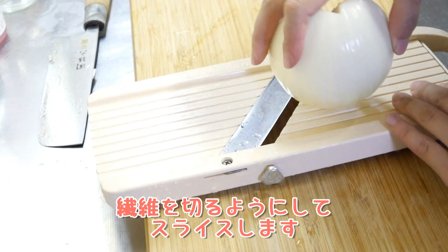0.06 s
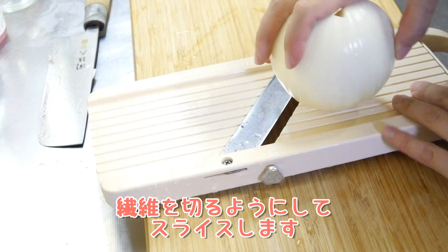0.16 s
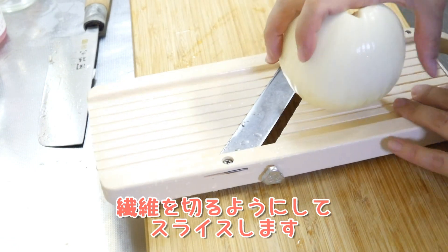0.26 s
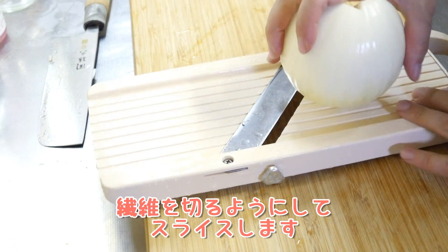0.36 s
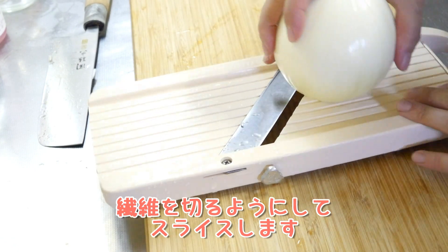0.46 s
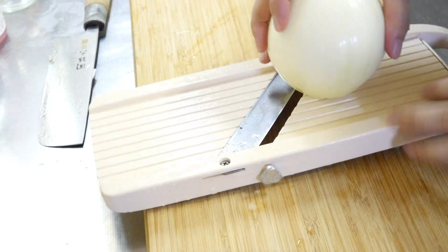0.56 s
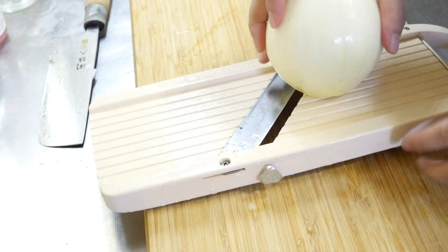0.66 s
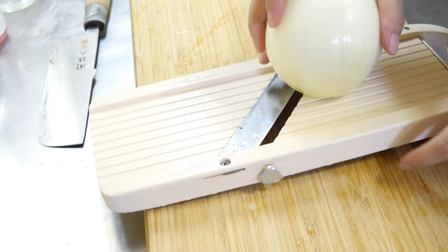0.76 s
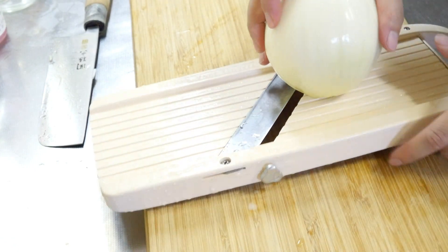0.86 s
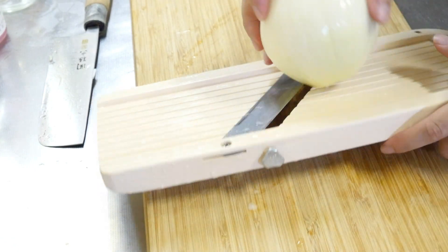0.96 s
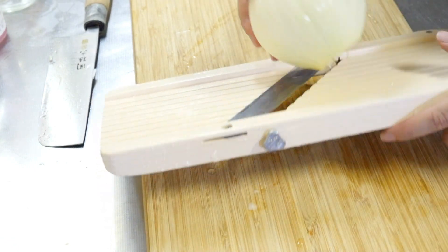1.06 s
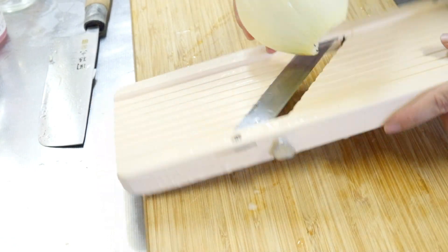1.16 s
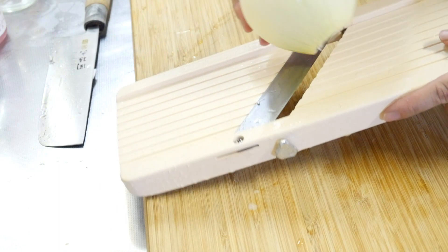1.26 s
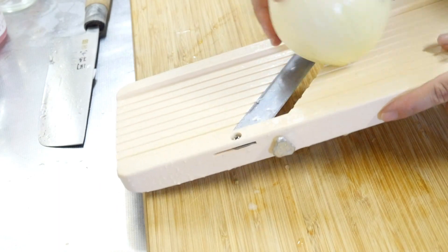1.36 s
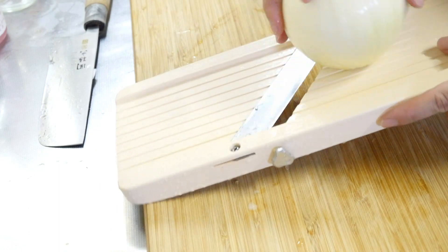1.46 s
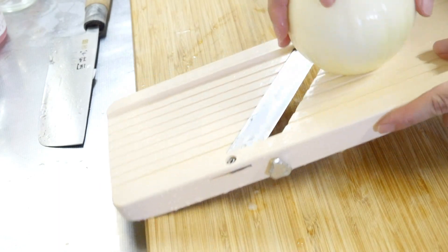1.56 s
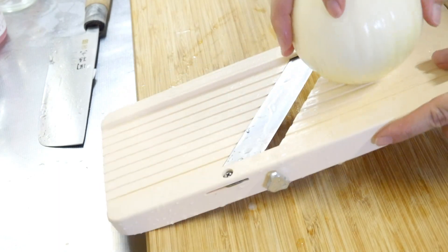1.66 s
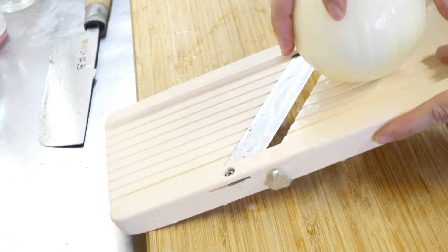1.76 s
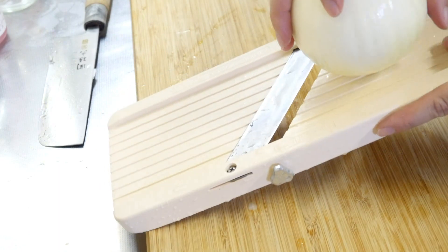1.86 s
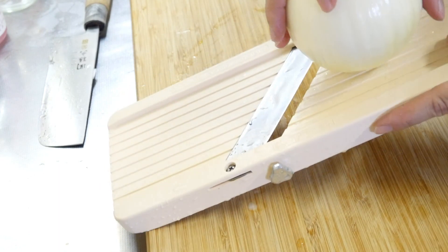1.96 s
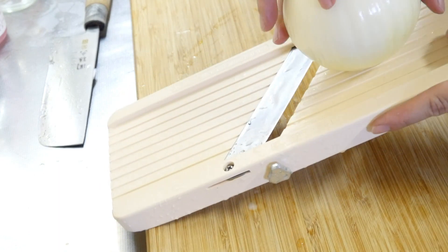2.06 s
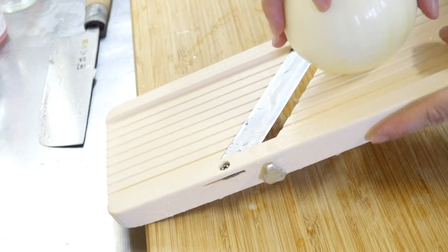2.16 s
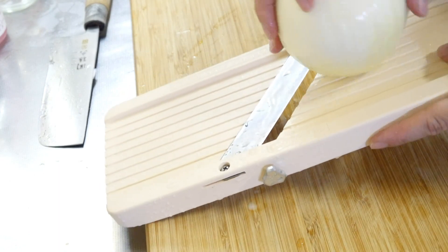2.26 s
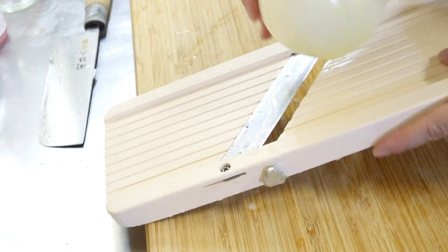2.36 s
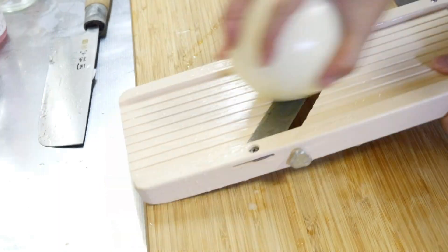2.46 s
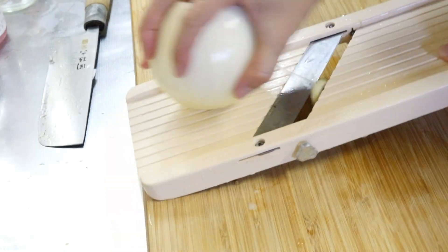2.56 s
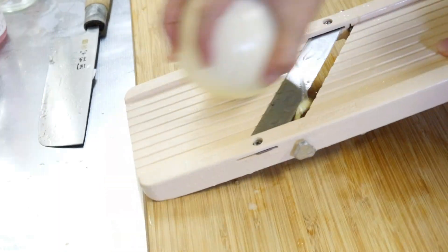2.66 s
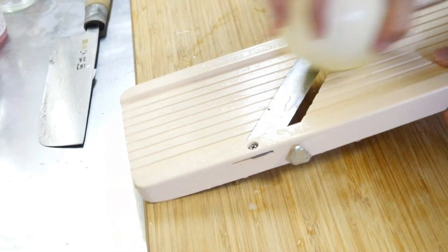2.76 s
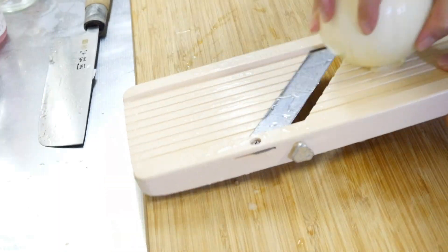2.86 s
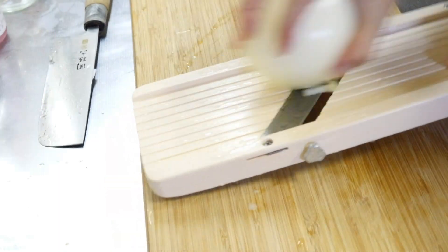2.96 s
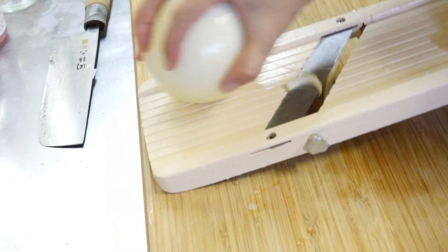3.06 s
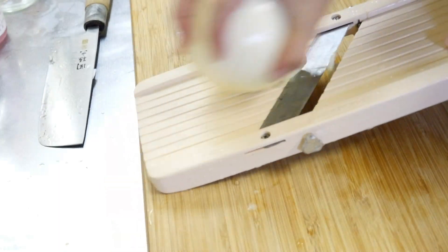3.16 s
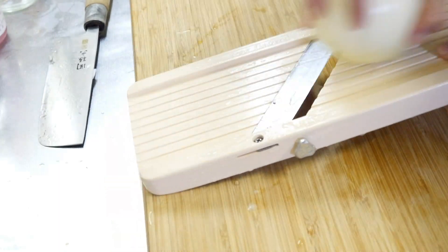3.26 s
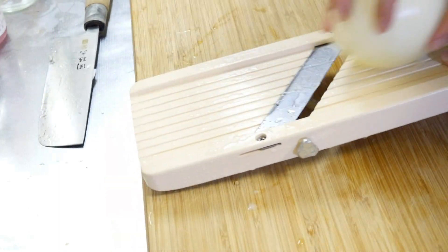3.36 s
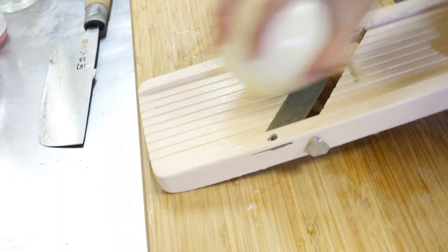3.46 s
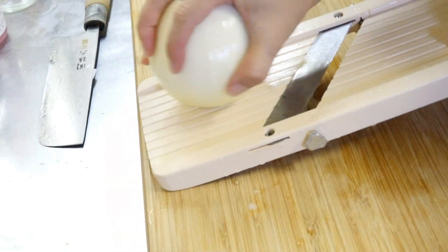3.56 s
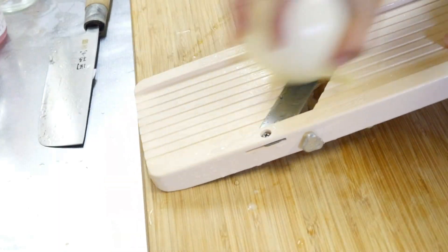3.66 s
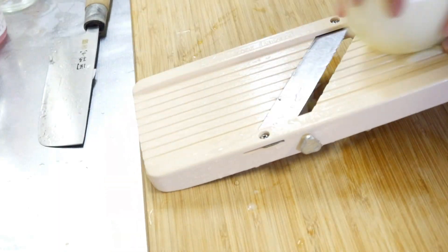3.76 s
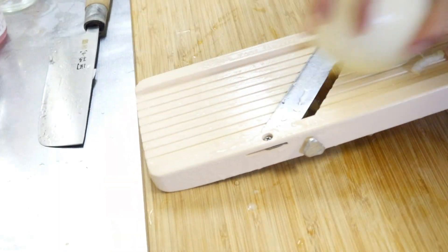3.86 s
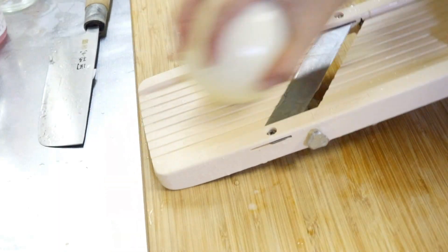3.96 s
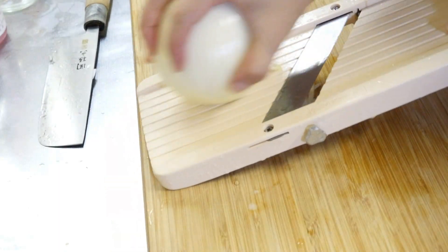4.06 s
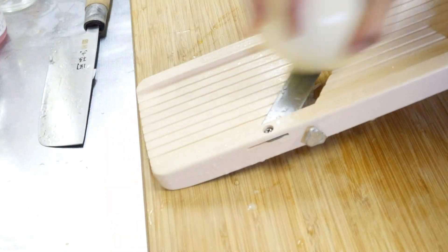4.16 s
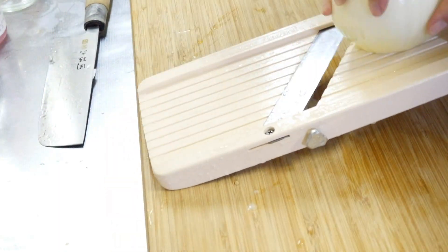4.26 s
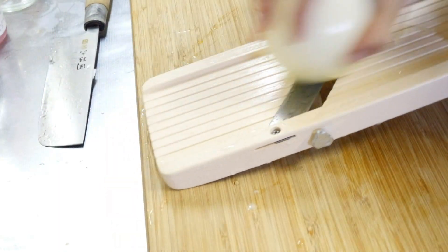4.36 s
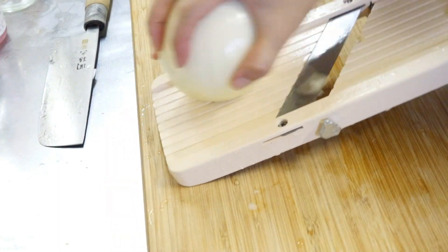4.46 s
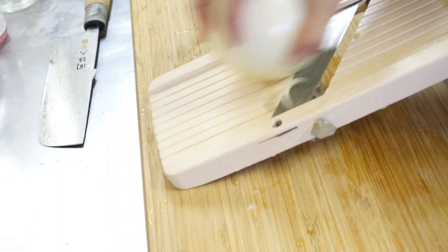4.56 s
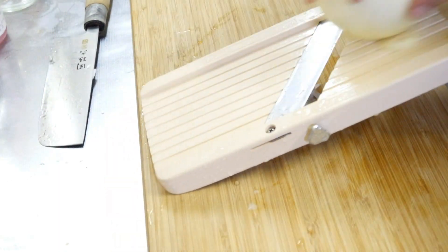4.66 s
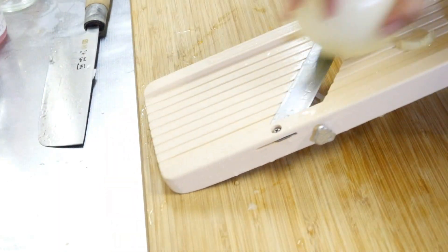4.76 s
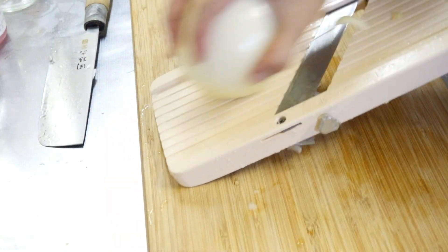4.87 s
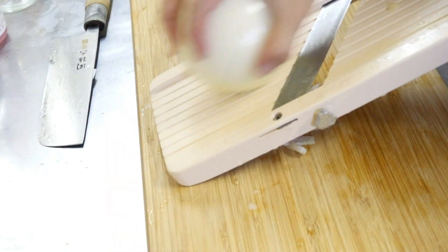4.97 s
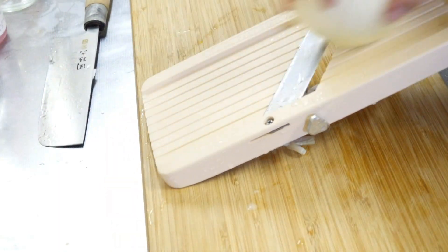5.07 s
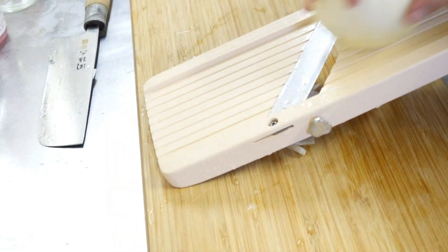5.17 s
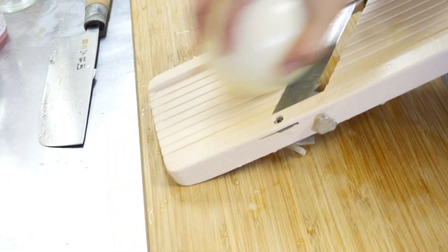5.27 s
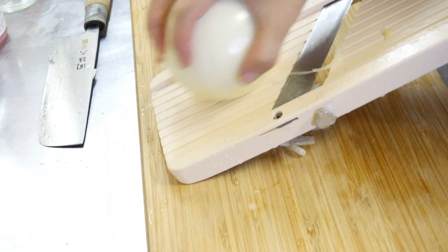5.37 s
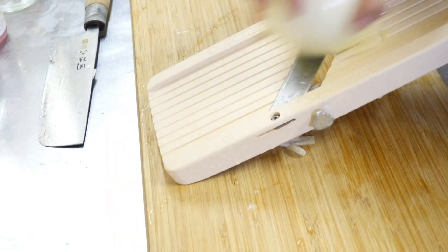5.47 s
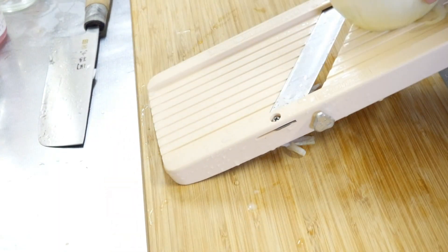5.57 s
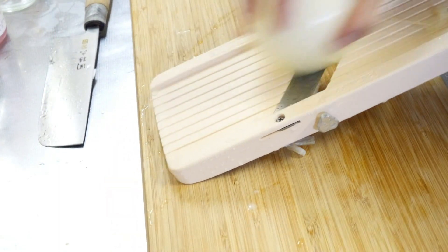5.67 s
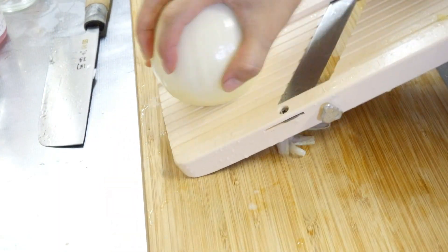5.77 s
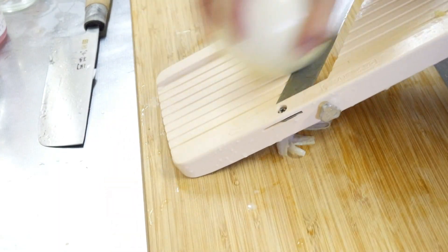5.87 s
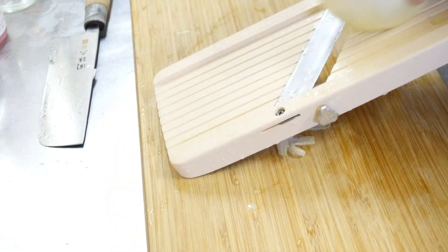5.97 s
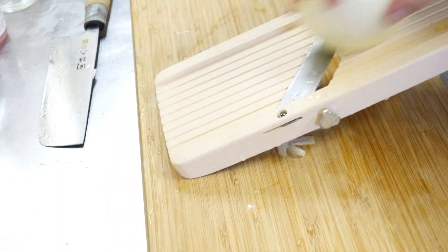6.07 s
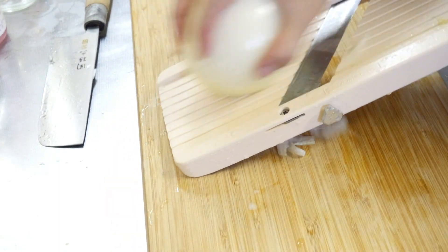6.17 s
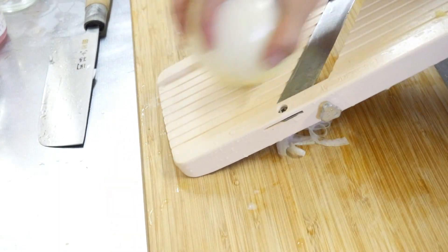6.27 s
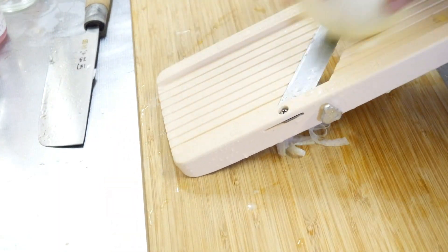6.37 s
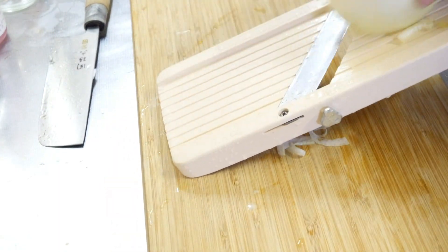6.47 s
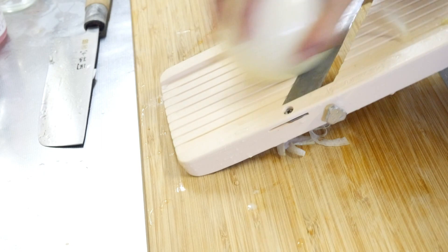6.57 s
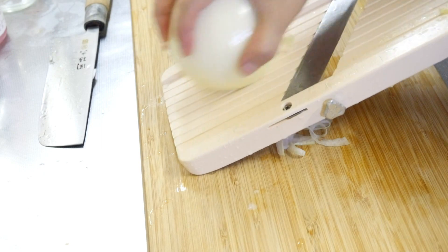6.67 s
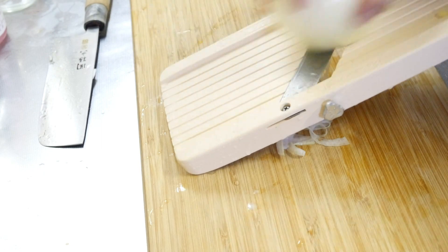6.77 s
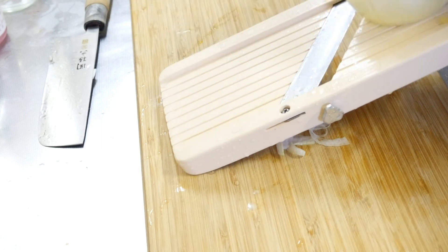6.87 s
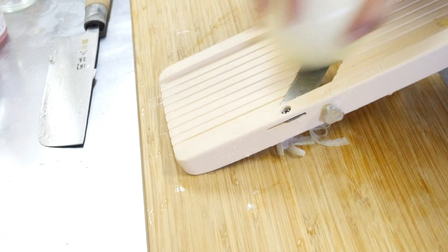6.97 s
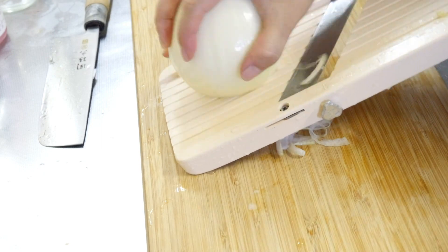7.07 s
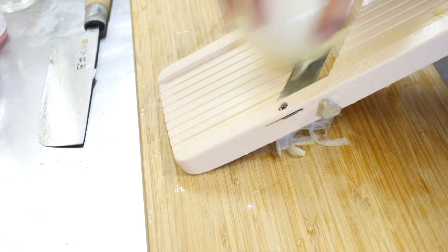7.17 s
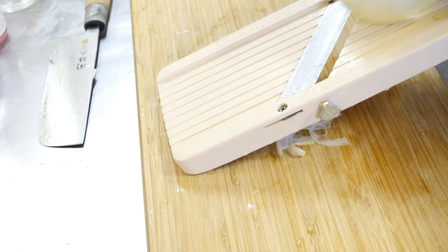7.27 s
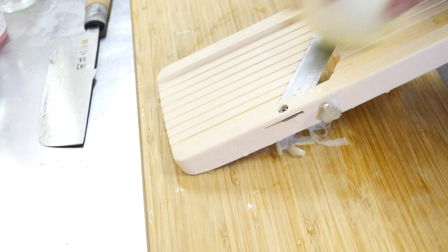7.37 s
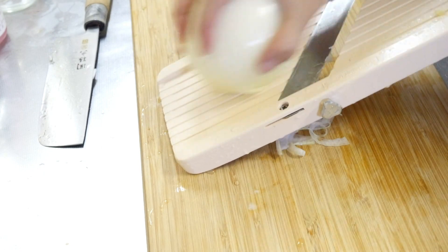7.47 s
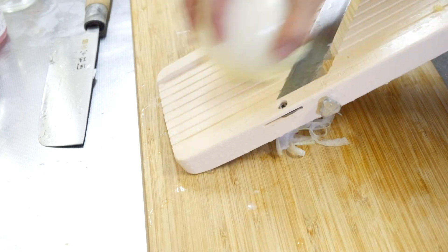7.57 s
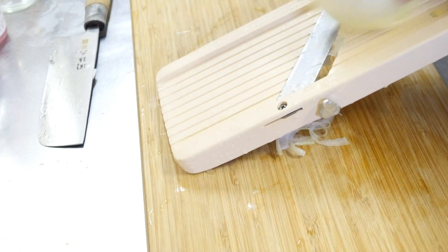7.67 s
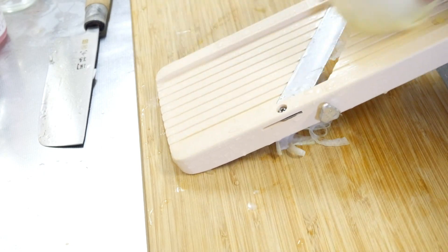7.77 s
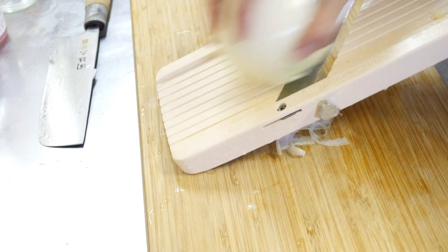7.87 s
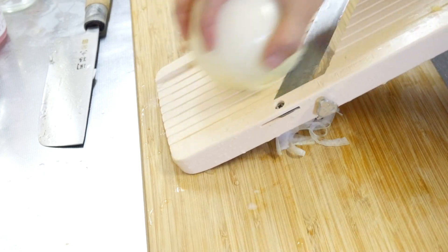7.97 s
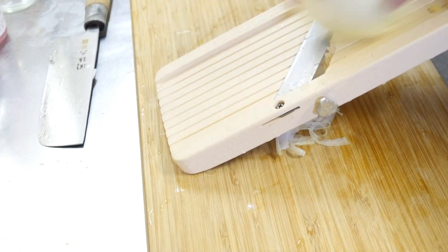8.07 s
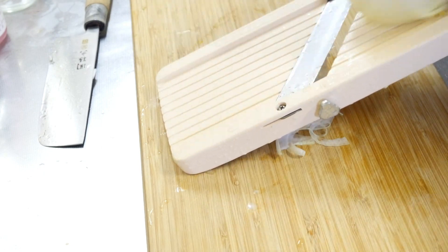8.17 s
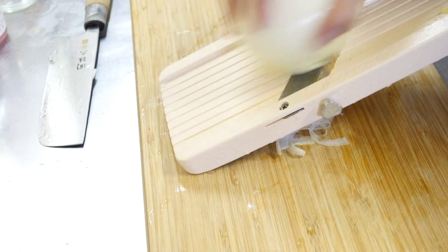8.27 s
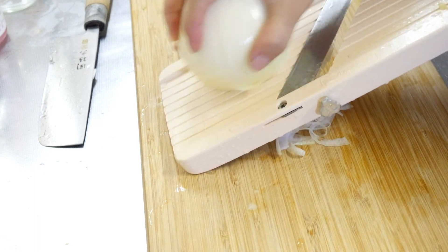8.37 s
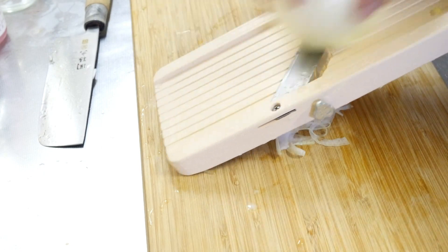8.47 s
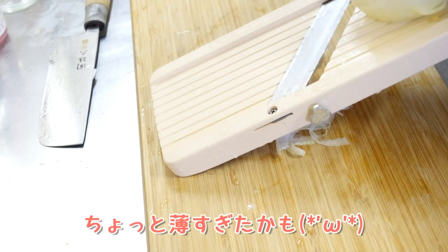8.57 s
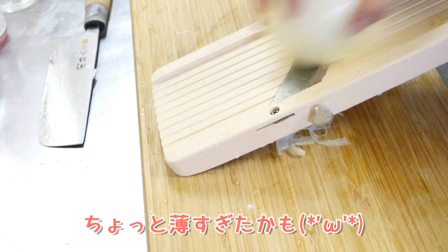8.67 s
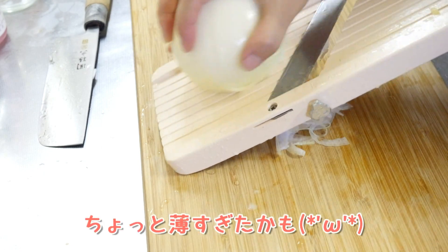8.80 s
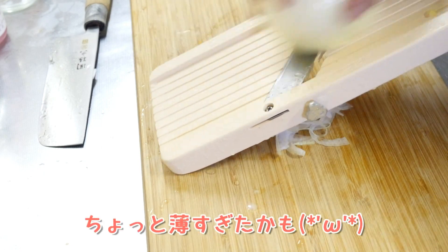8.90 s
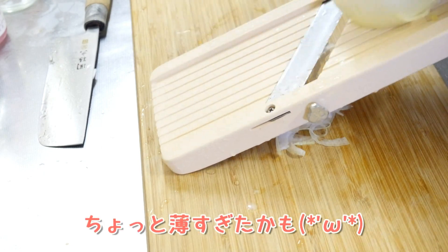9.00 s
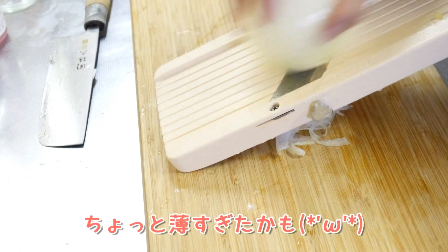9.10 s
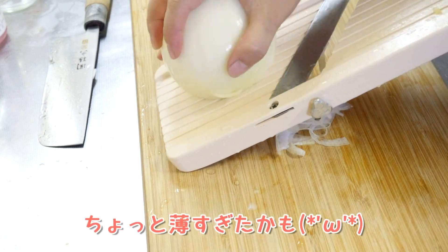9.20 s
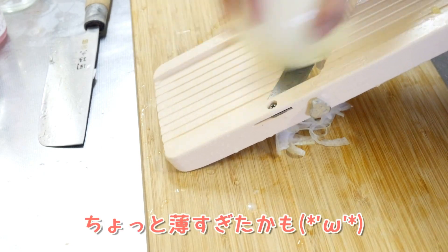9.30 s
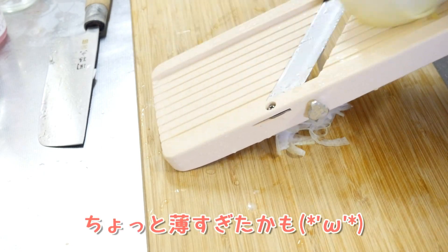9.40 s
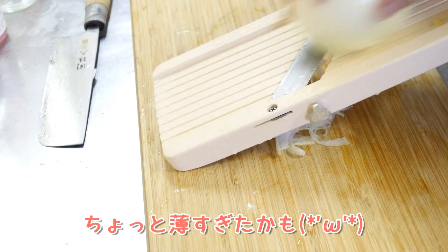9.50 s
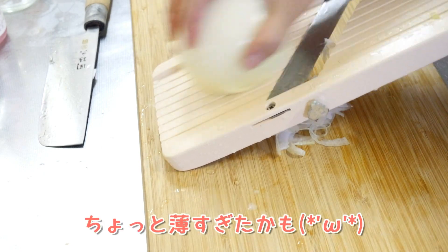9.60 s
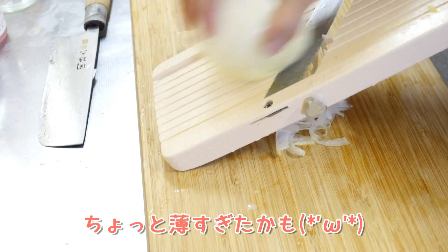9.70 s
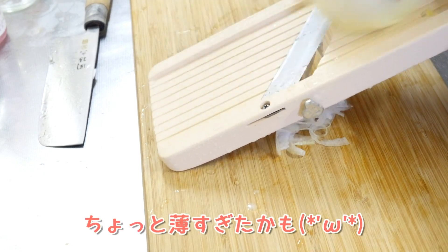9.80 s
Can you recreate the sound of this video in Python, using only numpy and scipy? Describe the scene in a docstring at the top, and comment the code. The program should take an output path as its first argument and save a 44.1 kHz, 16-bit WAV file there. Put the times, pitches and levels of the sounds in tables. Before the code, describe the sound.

Quick wet rasping strokes of an onion across a ribbed hand slicer, with light knocks and clicks, in a small hard kitchen.

```python
"""Onion on a ribbed slicer

An onion is slid up and down a ribbed plastic slicer that stands on a wooden board in a small hard kitchen.
Each push is friction noise: a wet hiss from the ribs, a rasp through the blade and deck modes, a rumble in the body.
Knocks, clicks and tearing slices are impulses into resonances, answered by a wall and a decaying noise tail.
Dragging and faint squeaks are noise through a few modes; a fan, as shaped noise, hums far away.
"""
import sys
import numpy as np
from scipy import signal
from scipy.fft import rfft, irfft, next_fast_len
from scipy.io import wavfile
from scipy.ndimage import uniform_filter1d, map_coordinates

SR = 44100
rng = np.random.default_rng(int(sys.argv[2]) if len(sys.argv) > 2 else 0)


def unload_audio(sound):
    """Save the sound as a 16-bit wav file, at the path given as the first command line argument."""
    columns = np.transpose(np.atleast_2d(sound))
    # keep every value between -1 and 1, then stretch to whole-number steps
    steps = np.round(np.clip(columns, -1, 1) * 32767)
    wavfile.write(sys.argv[1], SR, steps.astype(np.int16))


N = 433944  # length in samples

# Cutting pushes down the slope. Each row: fastest moment in seconds, climb in seconds,
# wet hiss in dB, blade rasp in dB, body rumble in dB.
PUSHES = [(2.534, 0.014, -37.5, -49.5, -41.5), (3.013, 0.048, -44.5, -43, -43.5),
          (3.49, 0.031, -42, -38.5, -39), (3.963, 0.04, -44, -40.5, -38), (4.422, 0.035, -43, -39.5, -40),
          (4.86, 0.059, -46, -43, -41.5), (5.286, 0.05, -43.5, -41.5, -42.5),
          (5.725, 0.05, -43.5, -42, -39.5), (6.158, 0.05, -42.5, -40.5, -45),
          (6.599, 0.068, -45.5, -42.5, -42), (7.032, 0.059, -43, -40.5, -41),
          (7.467, 0.058, -43, -39.5, -42.5), (7.894, 0.052, -44, -42.5, -46.5),
          (8.31, 0.056, -46, -43.5, -44.5), (8.735, 0.045, -42.5, -42, -43.5),
          (9.165, 0.072, -46.5, -45.5, -44.5), (9.61, 0.072, -45.5, -43.5, -41)]
# Light pulls back up. Each row: fastest moment in seconds, climb in seconds,
# hiss in dB, rasp in dB, rumble in dB.
PULLS = [(2.79, 0.036, -51.5, -54, -49), (3.33, 0.095, -53.5, -58.5, -46.5),
         (3.771, 0.1, -60.5, -58.5, -48), (4.282, 0.16, -61.5, -61.5, -50),
         (4.673, 0.059, -56.5, -55.5, -47.5), (5.086, 0.053, -59, -55, -41),
         (5.517, 0.052, -58, -57.5, -48), (5.96, 0.051, -57.5, -54.5, -45),
         (6.407, 0.077, -63.5, -58.5, -49), (6.817, 0.057, -60, -55.5, -48), (7.2, 0.013, -66, -55.5, -46),
         (7.72, 0.11, -67, -60, -48), (8.104, 0.081, -60, -59.5, -47), (8.525, 0.042, -57, -53, -45),
         (8.938, 0.055, -58, -57.5, -47.5), (9.407, 0.1, -68, -65, -47), (9.76, 0.017, -62, -67, -46)]
# Hands shift the slicer and set the onion down. Each row: fastest moment in seconds, climb in seconds,
# hiss in dB, rasp in dB, rumble in dB.
SHIFTS = [(.886, 0.079, -80, -79, -59), (.956, 0.0065, -59.5, -69, -57), (1.02, .03, -72, -68, -59),
          (1.17, 0.097, -73, -65.5, -58), (1.49, 0.0042, -61, -67, -61), (1.58, 0.054, -63, -52, -48),
          (1.665, .08, -61.5, -58, -57.5), (2.171, .08, -77, -70.5, -66)]
# Course of a push; rows for hiss, rasp and rumble. Each row: lag behind the fastest moment in seconds,
# onset in dB per second, gain during the climb in dB, fall in dB per second.
PUSH_COURSE = [(.001, 663, 7, 230), (.002, 450, 10, 213), (0.018, 250, 13.5, 163)]
# Course of a pull; rows for hiss, rasp and rumble. Each row: lag in seconds,
# onset in dB per second, gain during the climb in dB, fall in dB per second.
PULL_COURSE = [(.001, 246, 4.6, 163), (.002, 199, 1.33, 182), (.005, 250, 4, 150)]
# Course of a shift; rows for hiss, rasp and rumble. Each row: lag in seconds,
# onset in dB per second, gain during the climb in dB, fall in dB per second.
SHIFT_COURSE = [(.001, 500, 3, 240), (.002, 299, 3.8, 180), (.005, 250, 4, 150)]
# Spectrum of the wet hiss. Each row: frequency in Hz, relative level in dB.
HISS_SPECTRUM = [(2060, -24), (3500, -5), (4810, -5.5), (6700, -4.5), (7850, -7), (9030, -1.5), (10900, -1),
                 (14500, -11.5), (16000, -20)]
# Modes of the thin deck and blade. Each row: centre in Hz, width in Hz, relative level in dB.
DECK_MODES = [(816, 540, -14.5), (1074, 46, -2), (1280, 160, -8.5), (1468, 80, -2.5), (1930, 120, -2),
              (2237, 130, 1.5), (2873, 400, -1), (3176, 170, 3.5), (3900, 1330, -1.5)]
# Modes of the slicer's body and board. Each row: centre in Hz, width in Hz, relative level in dB.
BODY_MODES = [(73, 23, -14.5), (106.7, 15, -3.5), (134.4, 8.6, 3), (167.6, 14, -7), (217.8, 16.1, 2.5),
              (277.4, 5, -4.5), (358.6, 39.7, -3.5), (434, 30, -8.5), (552.4, 9.8, -9), (710, 67, -11),
              (744, 142, -8.5)]

# Knocks of slicer and onion. Each row: start in seconds, relative level in dB, thud in dB, treble setting in dB,
# ring in Hz, thud centre in Hz, ring in dB, echo setting in dB.
KNOCKS = [(0.546, -17.5, -11.5, -49, 825, 217, -5.5, 6.5), (0.6, -23, -15, -51, 880, 207, -5, 1.5),
          (0.637, -26, -7.5, -53, 826, 213, -5, 0.5), (0.821, -34.5, -7.5, -9, 903, 410, -5.5, 0.5),
          (0.952, -45.5, -12, -5.5, 3990, 348, -4, 1), (1.052, -34.5, -18.5, -19, 870, 428, -9.5, 0.5),
          (1.231, -14.5, -18, -17.5, 1130, 363, -9, 8), (1.434, -60.5, 0, 6, 999, 266, -2, -1),
          (1.491, -21, -7, -51, 1094, 431, -2.5, 4), (2.502, -34.5, -13, -15, 1290, 151, -6, 10),
          (2.728, -48.5, -24, -6, 3800, 223, 10, 5.5), (2.922, -30, -38, -13.5, 1340, 256, -12, 2),
          (3.103, -17.5, -15.5, -30.5, 2140, 428, -6.5, 1.5), (3.269, -37, -4.5, -12, 1140, 360, -17, 0),
          (3.348, -43.5, -13, -34, 1110, 371, 5, -1), (3.485, -12.5, -16.5, -28, 1970, 363, -5, 2.5),
          (3.738, -38, 1, -11, 814, 152, -7, -6), (3.919, -20.5, -9, -39, 1075, 435, -12.5, 2),
          (4.145, -39.5, -6.5, -16, 1500, 423, -4, 9.5), (4.782, -44.5, -12, -10, 1130, 522, 3.5, 11.5),
          (6.332, -37.5, -10, -40, 1120, 194, -3, -3), (6.398, -41, -25, -21, 1064, 363, 4, 9),
          (6.49, -30.5, -9, -50, 744, 369, -13, 3), (7.185, -36, -5, -11, 1380, 153, -18, -9),
          (7.784, -34, 0, -74, 760, 365, -8, 1.5), (8.02, -33.5, -12, -26, 1160, 213, -15, -2),
          (8.066, -25, -15.5, -21.5, 1120, 199, -11, -1), (8.444, -36, -18, -8.5, 1260, 202, -9, -2.5),
          (8.927, -33.5, -14.5, -30, 751, 151, -13, 2.5), (9.214, -42, -8.5, -23, 733, 180, -11, 6.5),
          (9.656, -39, -17, -20, 735, 210, -8, -12), (9.744, -37, -13, -22, 4170, 191, 0, 5)]
# Sharp clicks at the blade's back edge. Each row: start in seconds, relative level in dB, thud in dB,
# treble setting in dB, echo setting in dB, left over right in dB.
CLICKS = [(6.373, -33.5, -17, -17, 3.5, -1), (6.765, -30, -10, -22, -0.5, -1.5),
          (6.802, -26.5, -26, -16, 1.5, -1), (7.2266, -15, -25.5, -11, 2, -2),
          (7.62, -25.5, -17, -16.5, -0.5, .5), (7.6606, -21, -23.5, -14, 1, -2),
          (7.957, -29, -21, -16.5, 2, -.5), (8.368, -32.5, -17, -20, 2.5, 1),
          (9.311, -25.5, -19, -16, 2.5, 1.5), (9.35, -27.5, -14.5, -14.5, 2, -1),
          (9.7835, -11.5, -24, -7.5, -0.5, -5)]
# What all clicks share. The row: ring in Hz, thud centre in Hz, ring in dB.
CLICK_TONE = (2710, 150, -3)
# A slice tears free during a push. Each row: start in seconds, relative level in dB.
TEARS = [(4.835, -30), (4.863, -33), (5.262, -36), (5.702, -38), (6.133, -34.5), (6.563, -32), (7.866, -33),
         (8.285, -29.5), (8.717, -28.5), (9.13, -30.5), (9.575, -31)]
# What all tears share. The row: thud in dB, treble setting in dB, ring in Hz, thud centre in Hz,
# ring in dB, echo setting in dB.
TEAR_TONE = (-26.5, -15, 2295, 369, -1, 9)
DEEP_DB = -15  # deep modes relative to the thud
CONTACT_S = .0022  # time scale of the chattering contact
KNOCK_PAN_DB = .6  # left over right, for knocks and tears
WALL_S, WALL_DB = .0058, -12  # delay and gain of the nearest wall's single return
# Decay of the kitchen. Each row: frequency in Hz, time to fall by 60 dB in seconds.
KITCHEN_DECAY = [(100, 0.46), (260, 0.21), (700, 0.34), (1840, 0.31), (4850, 0.3), (12800, 0.28)]

# The slicer's foot drags on the board. Each row: centre in seconds, half length (to 1/e) in seconds,
# woody scrape in dB, low bump in dB.
DRAGS = [(1.523, 0.029, -58, -45), (3.064, 0.018, -71, -40), (4.16, 0.025, -53, -64),
         (4.626, 0.011, -59, -39.5), (5.045, 0.02, -57, -55), (5.194, .012, -74, -53),
         (5.466, 0.016, -58, -58), (6.444, .03, -63, -56), (7.114, .025, -64, -46), (7.37, .015, -72, -49),
         (8.51, .04, -46, -60), (8.57, .02, -58, -46), (8.887, 0.012, -61, -55), (9.027, 0.041, -66, -48.5)]
# Wet skin creeps on the deck. Each row: centre in seconds, half length (to 1/e) in seconds, level in dB.
SQUEAKS = [(1.633, 0.054, -54), (2.16, 0.061, -67)]
# Spectrum of the fan. Each row: frequency in Hz, relative level in dB.
FAN_SPECTRUM = [(12, -43), (20, -26.5), (44, -20), (65, -9.5), (81, -13.5), (168, -4), (210, -17),
                (262, 0.5), (301, -10), (459, -8), (527, -7.5), (849, -17), (5080, -34), (10200, -29.5),
                (16000, -41)]
FAN_DB = -61  # rms level

# Likeness of left and right in the field. Each row: frequency in Hz, likeness from 0 to 1.
LIKENESS = [(60, 0.55), (150, 1), (380, 0.94), (950, 0.35), (2380, 0.15), (5980, 0.21), (15000, 0.63)]
# Unlike colour of the two capsules. Each row: frequency in Hz, left over right in dB.
CAPSULE_LEAN = [(250, 0), (500, -0.5), (1000, -3.5), (2000, 1.5), (4000, 1), (15000, -1.5)]
NOTCH_HZ, TOP_HZ = 7870, 15600  # centre of the narrow notch, band limit


def amp(db):
    """Decibel law: the amplitude factor of a level in dB."""
    return 10 ** (np.asarray(db) / 20)


def unit(x):
    """Power normalisation: the signal scaled to rms 1."""
    return x / np.sqrt(np.mean(x ** 2) + 1e-20)


def peak(x):
    """Peak normalisation: the signal scaled to a largest magnitude of 1."""
    return x / np.abs(x).max()


def along(points, hz):
    """Interpolation of (Hz, value) points on a logarithmic frequency axis."""
    f, value = np.transpose(points)
    return np.interp(np.log(hz + 1), np.log(f + 1), value)


def wobble(rate):
    """Band-limited fluctuation: a smooth random curve with rate knots per second."""
    knots = rng.standard_normal(int(N * rate / SR) + 4)
    return map_coordinates(knots, [np.arange(N) * rate / SR])


def filtered(x, response):
    """Linear filtering: the spectrum of x times a complex response of frequency."""
    n = x.shape[-1]
    m = next_fast_len(n + min(n, 8192), True)
    return irfft(rfft(x, m) * response(np.fft.rfftfreq(m, 1 / SR)), m)[..., :n]


def modes(table):
    """Modal superposition: the causal response of resonances of alternating sign."""
    def response(f):
        total = 0
        for k, (centre, width, db) in enumerate(table):
            damping = 1j * f * width
            total = total + (-1) ** k * amp(db) * damping / (centre ** 2 - f ** 2 + damping)
        return total
    return response


def spread(pair):
    """Field coherence: two unrelated noises mix into left and right, with little difference in the bass."""
    def mid_and_side(hz):
        turn = np.arccos(np.clip(along(LIKENESS, hz), -1, 1)) / 2
        bass_cut = hz ** 2 / (hz ** 2 + 260 ** 2)
        return np.array([np.cos(turn), np.sin(turn) * bass_cut])
    mid, side = filtered(pair, mid_and_side)
    return np.array([mid + side, mid - side])


def grit(grain_db, rate, patchy_db):
    """Uneven contact: stereo noise broken into grains, with drifting patches of colour."""
    z = signal.stft(rng.standard_normal((2, N)), nperseg=256)[2]
    patches = uniform_filter1d(rng.standard_normal(z.shape[1:]), 5, 0)  # smooth across frequency
    patches = uniform_filter1d(patches, 8, 1)  # and across time
    pair = signal.istft(z * amp(patchy_db * unit(patches)), nperseg=256)[1][:, :N]
    return spread(pair) * amp(grain_db * wobble(rate))


def strokes():
    """Sliding friction: juice hisses on the ribs, torn fibres ring the deck, the drag shakes the hollow body."""
    power = passes(PUSHES, PUSH_COURSE) + passes(PULLS, PULL_COURSE) + passes(SHIFTS, SHIFT_COURSE)
    level = 10 * np.log10(power + 1e-12)

    hiss = filtered(grit(grain_db=2.0, rate=340, patchy_db=3.0), lambda hz: amp(along(HISS_SPECTRUM, hz)))

    tearing = unit(grit(grain_db=3.5, rate=360, patchy_db=4.0))
    tearing = tearing + 0.61 * unit(fibres(rate=500, spread_db=3.5))
    rasp = filtered(tearing, modes(DECK_MODES))
    dull = unit(filtered(rasp, lambda hz: 1 / (1 + (hz / 1400) ** 2)))
    # a slow, light pass hisses less and rasps darker
    bright_share = 1 / (3.0 + np.exp(-(level[0] + 39.5) / 4))
    rasp = bright_share * unit(rasp) + (1 - bright_share) * dull

    def hollow(hz):
        floor = amp(-16.5) * (hz > 70) * (hz < 900)  # fills the gaps between modes
        return modes(BODY_MODES[1:])(hz) + floor
    rumble = filtered(grit(grain_db=1.0, rate=80, patchy_db=2.46), hollow)
    return sum(amp(db) * unit(layer) for db, layer in zip(level, (hiss, rasp, rumble)))


def passes(rows, course):
    """Additive power of hiss, rasp and rumble: a quick onset, a climb to full speed, a steady fall."""
    power, t = np.zeros((3, N)), np.arange(0, N, 64) / SR
    columns = np.transpose(rows)[:, :, None]
    start, climb = columns[:2]
    for k, (lag, onset, gain_db, fall) in enumerate(course):
        u = t - start - lag
        drop = fall * np.maximum(u, 0)
        drop += gain_db * np.clip(-u / climb, 0, 1)
        drop += onset * np.maximum(-u - climb, 0)
        total = (amp(columns[2 + k] - drop) ** 2).sum(0)
        power[k] = np.interp(np.arange(N) / SR, t, total)
    return power


def fibres(rate, spread_db):
    """Random impulses: single fibres snap as sparse clicks, a few stronger, each from its own side."""
    chance, size, side = rng.random(N), rng.exponential(size=N), rng.normal(0, 0.71, N)
    clicks = (chance < rate / SR) * amp(spread_db * np.minimum(size, 2.5))
    return clicks * np.array([1 + side, 1 - side])


def knocks():
    """Impact excitation: a blow cracks, briefly rings the deck and thumps the body; the walls answer."""
    near, far = np.zeros((2, N + SR)), np.zeros((2, N + SR))
    t = np.arange(SR // 11) / SR
    tail_size, fft_size = SR // 3, SR // 2
    blows = [(*row, KNOCK_PAN_DB) for row in KNOCKS]
    blows += [(*row, *TEAR_TONE, KNOCK_PAN_DB) for row in TEARS]
    blows += [(*row[:4], *CLICK_TONE, *row[4:]) for row in CLICKS]
    for s, db, thud_db, treble_db, ring_hz, thud_hz, ring_db, echo_db, pan_db in blows:
        crack, tick = contact(t, treble_db)
        ring = amp(ring_db) * deck_ring(t, ring_hz)
        thud = body_thud(t, thud_db, thud_hz)
        snap = chattered(crack + tick, t)
        direct = ring + thud + 1.57 * np.pad(snap, (0, len(t)))[:len(t)]

        # the tail takes on the blow's spectrum
        colour = np.sqrt(sum(np.abs(rfft(part, fft_size)) ** 2 for part in (crack, tick, .18 * ring)))
        colour = colour + rfft(thud, fft_size)
        wet = irfft(rfft(echo(size=tail_size), fft_size) * colour, fft_size)[:, :tail_size]

        first = round(s * SR)
        near[:, first:][:, :len(t)] += amp(db - 2) * direct * amp([[pan_db / 2], [-pan_db / 2]])
        far[:, first + 200:][:, :tail_size] += amp(db + 3.5 + echo_db) * wet
    wall = amp(WALL_DB) * np.roll(near[::-1], round(WALL_S * SR), axis=1)  # returns with sides swapped
    return (near + wall)[:, :N] + spread(far[:, :N])


def contact(t, treble_db):
    """Contact stiffness: a soft contact has little treble and a low edge; returns crack and treble tick."""
    blow = 1. * (t == 0)
    edge = 5500 * amp(0.19 * treble_db)  # Hz
    deck = modes([(c, w, g + rng.normal(0, 4)) for c, w, g in DECK_MODES])

    def struck_deck(f):
        thin = 1j * f / (400 + 1j * f)  # a small spot radiates no bass
        soft = 1 / (1 + 1.41j * f / edge - (f / edge) ** 2) ** 2
        return (thin + 0.18 * deck(f)) * soft
    crack = peak(filtered(blow, struck_deck))
    tick = peak(filtered(blow, modes([(5700, 1300, 2.8), (10150, 2500, -0.5)])))
    return crack, amp(treble_db + 10) * tick


def deck_ring(t, ring_hz):
    """Damped oscillation: a spot of the deck falls by 60 dB in thirty cycles after a soft rise."""
    decay = amp(-60 * t * ring_hz / 30)
    rise = 1 - np.exp(-t * ring_hz)
    return peak(np.sin(2 * np.pi * ring_hz * t) * decay * rise)


def body_thud(t, thud_db, thud_hz):
    """Modal excitation: a short push drives the body, mostly in modes near the struck spot's pitch."""
    push = np.exp(-t / 0.00037) * t
    struck = []
    for c, w, g in BODY_MODES[3:]:
        distance = abs(np.log2(c / thud_hz))  # octaves
        struck.append((c, w, g + rng.normal(0, 4.1) - 6 * distance))
    thud = amp(thud_db) * peak(filtered(push, modes(struck)))
    deep = amp(thud_db + DEEP_DB) * peak(filtered(push, modes(BODY_MODES[:3])))
    return thud + deep


def chattered(sound, t):
    """Repeated contact by convolution: the contact breaks up over a few milliseconds."""
    chatter = rng.standard_normal(len(t)) * t * np.exp(-(t / CONTACT_S) ** 2)
    touches = chatter[:400] / np.linalg.norm(chatter)
    touches[0] += 0.54  # the first touch
    return np.convolve(sound[:900], touches)


def echo(size):
    """Reverberant decay: two fresh unrelated noise tails; each frequency dies at its own speed."""
    hz, t, z = signal.stft(rng.standard_normal((2, size)), SR, nperseg=256)
    close = 1 + 0.74 * amp(-60 * t / 0.083)  # board and counter answer first and strongest
    decay = amp(-60 * t / along(KITCHEN_DECAY, hz)[:, None])
    tail = signal.istft(z * close * decay, SR, nperseg=256)[1][:, :size]
    return tail / np.linalg.norm(tail[0])  # left tail of energy 1


def drags():
    """Stuttering friction: grainy noise drives the upper body modes, and a shove the deep ones."""
    t = np.arange(0, N, 64) / SR

    def swell(k):
        bumps = sum(amp(row[k]) * np.exp(-((t - row[0]) / row[1]) ** 2) for row in DRAGS)
        return np.interp(np.arange(N) / SR, t, bumps)
    rub = rng.standard_normal(N) * amp(4.0 * wobble(rate=120))
    woody = filtered(rub, modes(BODY_MODES[-2:] + DECK_MODES[:1]))
    low = filtered(rub, modes(BODY_MODES[:5]))
    return swell(k=2) * unit(woody) + swell(k=3) * unit(low)


def squeaks():
    """Resonant selection: creeping wet skin is faint narrow noise in one mode of the deck."""
    t = np.arange(N) / SR
    swell = sum(amp(db) * np.exp(-((t - s) / half) ** 2) for s, half, db in SQUEAKS)
    mode = modes([(2260, 230, 0)])
    narrow = filtered(rng.standard_normal((2, N)), lambda hz: mode(hz) ** 2)
    return swell * unit(narrow)


def fan():
    """Broadband flow noise: far, slightly unsteady air shaped by the fan's spectrum."""
    noise = grit(grain_db=1.4, rate=5.26, patchy_db=0.0)
    air = filtered(noise, lambda hz: amp(along(FAN_SPECTRUM, hz)))
    return amp(FAN_DB) * unit(air)


def scene():
    """Superposition over the fan's hum; by radiation efficiency a hand-sized slicer gives no deep bass."""
    def small(hz):
        return (1j * hz / (70 + 1j * hz)) ** 3
    return filtered(strokes() + squeaks() + drags() + knocks(), small) + fan()


def record(dry):
    """Linear reception: two capsules of unlike colour, a narrow treble notch and a steep band limit."""
    def response(hz):
        lean = amp(np.outer([.5, -.5], along(CAPSULE_LEAN, hz)))
        notch = 1 - .9 / (1 + ((hz - NOTCH_HZ) / 45) ** 2)
        steep = 1 / (1 + (hz / TOP_HZ) ** 200)
        return lean * notch * steep
    return filtered(dry, response)


dry = scene()
out = record(dry)
unload_audio(out)
```